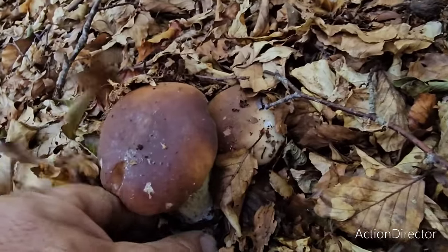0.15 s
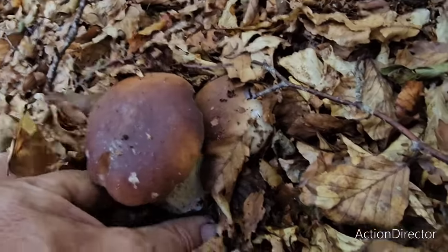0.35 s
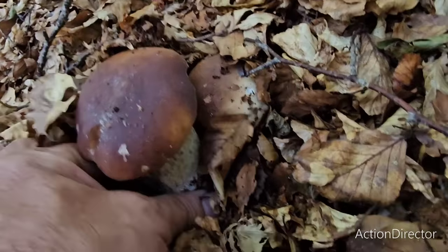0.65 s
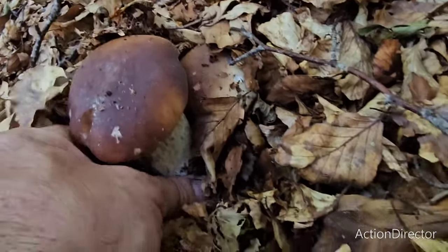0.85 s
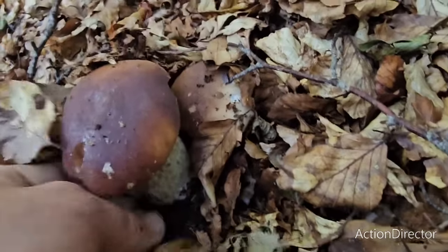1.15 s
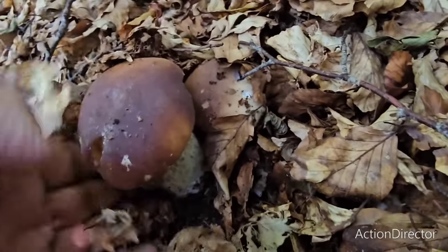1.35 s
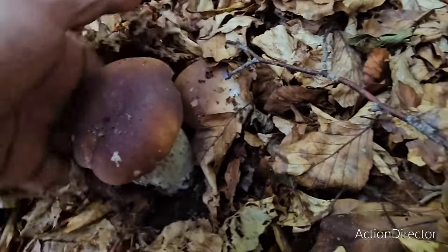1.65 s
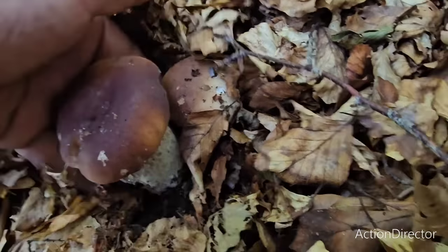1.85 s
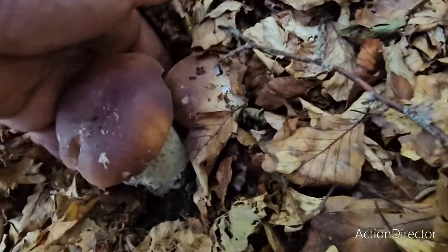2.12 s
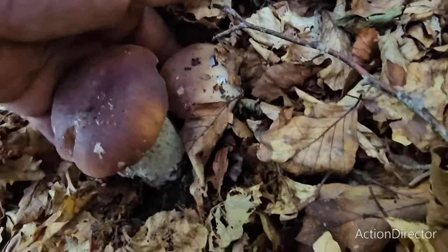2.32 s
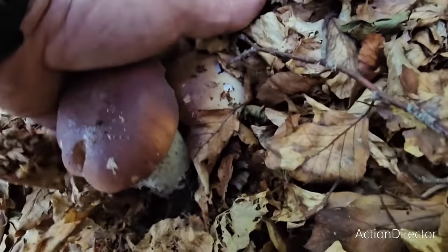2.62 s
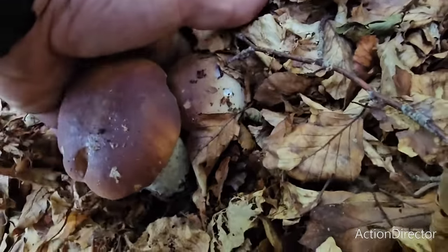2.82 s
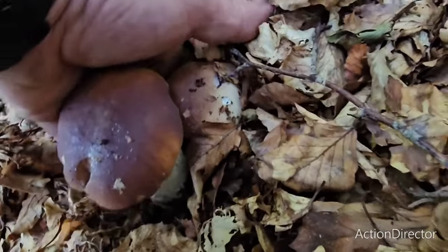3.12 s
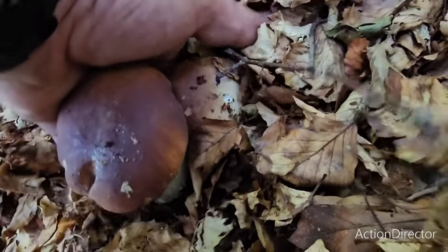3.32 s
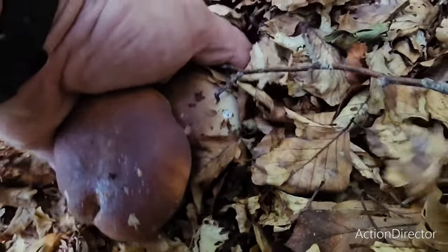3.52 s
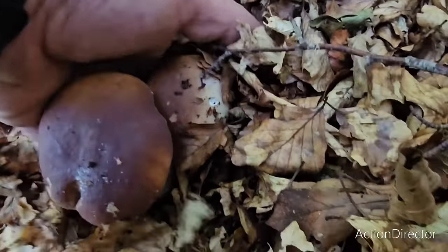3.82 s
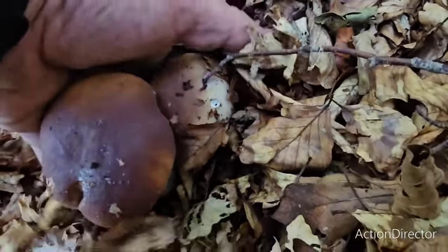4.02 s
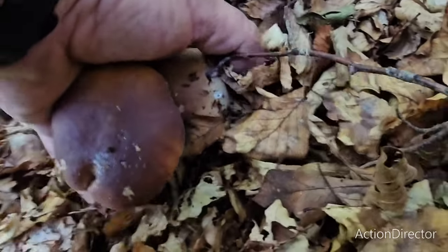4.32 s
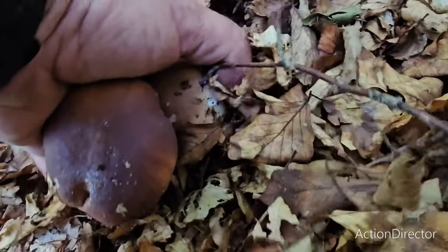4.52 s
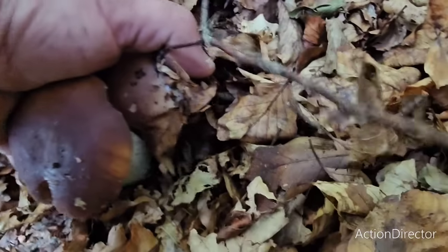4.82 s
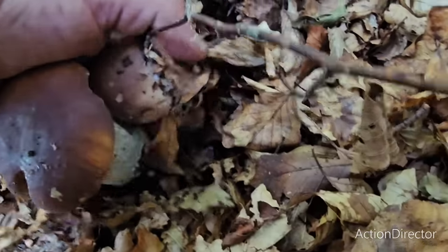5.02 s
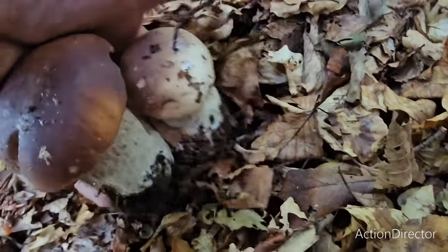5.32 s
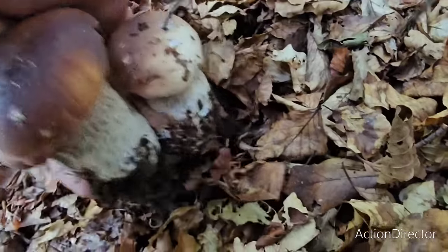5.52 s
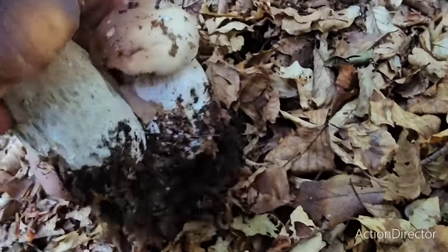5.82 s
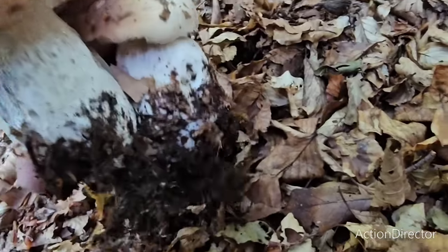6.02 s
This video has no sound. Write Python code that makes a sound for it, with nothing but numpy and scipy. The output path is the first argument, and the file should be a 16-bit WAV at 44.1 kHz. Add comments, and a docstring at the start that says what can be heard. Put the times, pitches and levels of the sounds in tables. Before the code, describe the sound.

Very close, dry stereo sound on a quiet forest floor, with a faint steady hush of air throughout. From 0 to 1.1 s a hand stirs dry leaves in quick, crisp, crackling strokes, the fullest of the take, with sharp snaps around 0.3, 0.5, 0.8 and 0.9 s and brief hollow scraping of a curled leaf near 0.2-0.3 and 1 s. From 1.3 to 2.6 s rustles come in separate swells, with brittle ticks and soft soil thuds. From 2.7 to 4.5 s movement is lighter: fine crumpling, small clicks, and short dull stem knocks near 3.6 s. A quick rustle and low woody pop come at 4.6 s, then small tearing pops around 5 s. At 5.35 s a loud bright double crack with a low jolt stands out. Afterwards only sparse faint ticks, tiny pops and weak soil movement remain until about 6.15 s.

```python
"""Woodland floor: a hand works dry leaf litter, pulling mushrooms from the soil below a phone with two spaced ports.
Leaves crackle in dense grains of decaying noise, a curled leaf scrapes as noise on a sliding tone,
and snaps of leaves and twigs are short filtered bursts. Torn root threads are decaying sines (stem ring, soil jolt).
Filtered grains make the soil thud and the stems hum under each stroke; steady coloured noise is the woodland hush."""
import sys
import numpy as np
from scipy import signal
from scipy.fft import rfft, irfft, next_fast_len
from scipy.io import wavfile
from scipy.ndimage import map_coordinates

SR = 44100
rng = np.random.default_rng(int(sys.argv[2]) if len(sys.argv) > 2 else 0)


def pcm_store(signal):
    """Save signal as 16-bit PCM."""
    levels = np.round(np.clip(np.atleast_2d(signal), -1, 1) * 32767)
    wavfile.write(sys.argv[1], SR, levels.astype(np.int16).T)


N = 271656


def undb(db):
    """Amplitude gain of a level in dB."""
    return 10 ** (np.asarray(db) / 20)


def unit(x):
    """Scale to rms 1."""
    return x / np.sqrt(np.mean(x ** 2))


def unit_mid(pair):
    """Scale so that the mean of both ports has rms 1."""
    return pair / np.sqrt(np.mean(pair.mean(axis=0) ** 2))


def curves(table):
    """Columns of a time table, interpolated linearly at every sample."""
    time_s, *columns = np.transpose(table)
    return [np.interp(np.arange(N) / SR, time_s, column) for column in columns]


def colour(x, points):
    """Filter by (f/Hz, gain/dB) points joined on a log-frequency axis."""
    size = next_fast_len(N)
    hz, db = np.transpose(points)
    log_bins = np.log(np.fft.rfftfreq(size, 1 / SR) + 1)
    gain = undb(np.interp(log_bins, np.log(hz), db, left=-90, right=-90))
    return irfft(rfft(x, size) * gain, size)[..., :N]


def ports(x, lead_ms):
    """One source at both ports: the path to the right one is longer by lead_ms."""
    read_at = np.arange(N) - lead_ms * SR / 1000
    right = map_coordinates(x, [read_at], order=3, mode="nearest")
    return np.array([x, right])


def pan(db):
    """Left and right gains for a left-minus-right level."""
    return undb(np.array([db, -db]) / 2)


def crackle(per_s, scatter_db, tail_ms, most_db=15.0):
    """Noise gated by random cracks of uneven size; crack power decays with time constant tail_ms."""
    crack_db = np.minimum(scatter_db * rng.exponential(size=N), most_db)
    size = undb(crack_db) * (rng.random(N) < per_s / SR)
    power = signal.lfilter([1], [1, -np.exp(-1000 / (tail_ms * SR))], size ** 2)
    return unit(np.sqrt(power) * rng.standard_normal(N))


def patch(lead_ms, spread_ms, diffuse, count, **grain):
    """Crackles from several spots, each with its own path to the ports, plus port-independent scatter."""
    spots = sum(ports(crackle(**grain), lead_ms + spread_ms * k) for k in np.linspace(-1, 1, count))
    scattered = np.array([crackle(**grain), crackle(**grain)])
    return unit(spots) + diffuse * scattered


def effort():
    """Gains of rustle, thud and hum: stroke swells add in power to leaves still settling."""
    # strokes: peak t/s, rustle level/dB, rise and fall/ms per first 10 dB, thud and hum re rustle/dB
    strokes = [(0.059, -41, 400, 48, -13.5, -14.5), (0.188, -35, 68, 43, -9.5, -12.5),
               (0.28, -37, 76, 60, -11.5, -11.5), (0.383, -38, 48, 37, -8.5, -14.5),
               (0.46, -46.5, 60, 64, -6, -11), (0.545, -47.5, 28, 43, -5, -14),
               (0.67, -42, 82, 129, -10, -10), (0.81, -52.5, 33, 28, 2, -20),
               (0.939, -43, 78, 84, -12, -18), (1.016, -36.5, 98, 100, -7, -12.5),
               (1.3, -49, 400, 382, -8.5, -9.5), (1.495, -46, 18, 77, -6, -15),
               (1.61, -40.5, 67, 248, -9.5, -12.5), (1.786, -40, 258, 28, -18, -11.5),
               (1.935, -43, 39, 59, -16, -8.5), (2.063, -42.5, 28, 45, -8.5, -12),
               (2.16, -51, 200, 192, -14, -7), (2.255, -43, 33, 38, -10, -7.5),
               (2.445, -50, 20, 80, -9.5, -26), (2.518, -43.5, 61, 75, -15.5, -12),
               (2.7, -51, 200, 148, -9, -8.5), (2.87, -56, 55.5, 76, -9, -2),
               (3.02, -60, 50, 100, -6, -4.5), (3.14, -52, 177, 145, -8, -13),
               (3.26, -47, 116, 32, -15.5, -14), (3.442, -45, 97, 92, -11.5, -8.5),
               (3.649, -43, 110, 81, -11.5, -7.5), (3.82, -48, 83, 59, -8.5, -9.5),
               (3.93, -51, 62, 118, -9, -9), (4.088, -45, 20, 55, -4, -24),
               (4.15, -50.5, 68, 398, -10, -4.5), (4.415, -50, 302, 24, -16, -24),
               (4.52, -55, 32, 100, -8, -8), (4.597, -40.5, 36, 27, -11, -18),
               (4.65, -50, 40, 62, -12, -10), (4.728, -54, 70, 115, -9, -9),
               (4.849, -51, 117, 72, -15, -7.5), (4.93, -57.5, 40, 54, -10, -16),
               (5.0, -57, 96, 96, -1, -0.5), (5.15, -54.5, 107, 73, -2.5, 0.5),
               (5.25, -59.5, 75, 50, -3, -19), (5.389, -54, 37, 33, 6, 1), (5.44, -62, 62, 52, -20, -22),
               (5.56, -65, 65, 400, 4, 3.5), (5.91, -62.5, 28, 90, -15, -24),
               (5.974, -53, 20, 20, -28, -53.5), (6.15, -63.5, 24, 94, 9, 2)]
    # leaves settling between strokes: t/s, rustle level/dB
    settling = [(0, -53.5), (1.5, -66.5), (2.35, -61.5), (3, -64.5), (4.5, -97), (5.2, -57), (5.6, -74),
                (6.16, -63.5)]
    settling_thud_db = -20  # re settling rustle
    roundness = 1.455  # 1 = pointed swell, 2 = bell-shaped
    ms, rest = np.arange(N) / SR * 1000, undb(curves(settling)[0])
    power = (rest * np.array([[1], [undb(settling_thud_db)], [0]])) ** 2
    for s, db, rise_ms, fall_ms, thud_db, hum_db in strokes:
        late_ms = ms - s * 1000
        distance = np.where(late_ms < 0, -late_ms / rise_ms, late_ms / fall_ms)
        swell = undb(db - 10 * distance ** roundness)
        power = power + (swell * undb([[0], [thud_db], [hum_db]])) ** 2
    return np.sqrt(power)


def ticks(lead_ms, per_s=35., scatter_db=5.0, sharpness=42.0):
    """Stiff leaves flick free: sparse short cracks excite narrow resonances, each pitch at its own spot."""
    # leaf resonances: f/Hz
    leaf_rings_hz = [1307, 2350, 3100, 3640, 3900, 4080, 6500, 7460]
    out = 0
    for hz in leaf_rings_hz:
        flick = crackle(per_s, scatter_db, 0.18)
        ring = unit(signal.lfilter(*signal.iirpeak(hz, sharpness, SR), flick))
        out = out + ports(ring, lead_ms + 0.16 * rng.standard_normal())
    return unit_mid(out)


def leaves(lead_ms, rustle):
    """Crisp crackle, duller crumpling and a fine hiss of leaf edges, all following the hand."""
    # spectra of crisp leaves, crumpling and leaf edges: f/Hz, relative gain/dB
    leaf = [(1800, -73), (2500, -5.5), (3300, 2), (4300, 5.5), (5800, 1.5), (7500, 3.5), (9500, -0.5),
            (11000, -11.5)]
    crumple = [(400, -10.5), (750, -1.5), (1100, -1), (1500, -2), (2000, 0), (2600, -9), (3500, -3)]
    fine_edges = [(8000, -54), (9800, -8), (10500, -4), (11800, 4), (14800, 1.5), (16500, -2)]
    # colour of the rustle: t/s, crumple re crisp/dB, fine hiss re crisp/dB, left minus right/dB
    tone = [(0, -7.5, -3.5, -2.5), (.35, -6, -0.5, 0), (.7, -7, -3.5, 0), (1.0, -5, -4.5, 0),
            (1.3, -4, -0.5, -0.5), (1.7, -7, -1, 1), (2.1, -6.5, -3.5, -0.5), (2.5, -6.5, -1, 1),
            (3.0, -5.5, -2, -0.5), (3.6, -6, -1.5, 0), (4.1, -7.5, 0, -1), (4.6, -7, -1, -0.5),
            (5.0, -7, -1, 0.5), (5.4, -5, -0.5, -1), (5.7, -6.5, -1, -3), (6.16, -10, 2.5, 0)]
    dull_db, fine_db, pan_db = curves(tone)
    bed = patch(lead_ms, 0.072, 1.0, count=4, per_s=500., scatter_db=6.5, tail_ms=3.3)
    # sparse needle-sharp breaks over that bed
    breaks = patch(lead_ms, 0.1, 0.5, count=2, per_s=55.0, scatter_db=0.0, tail_ms=0.16)
    cracks = unit(bed) + 0.38 * unit(breaks)
    folds = patch(lead_ms, 0.082, 0.74, count=2, per_s=300., scatter_db=4.0, tail_ms=3.5)
    edges = patch(lead_ms, 0.091, 1.0, count=2, per_s=470.0, scatter_db=6.5, tail_ms=1.0)
    # the same cracks reach partly into the neighbouring ranges
    dull = unit_mid(colour(folds + 0.54 * cracks, crumple)) * undb(dull_db)
    fine = unit_mid(colour(edges + 0.74 * cracks, fine_edges)) * undb(fine_db)
    crisp = unit_mid(unit_mid(colour(cracks, leaf)) + 0.2 * ticks(lead_ms))
    return (crisp + dull + fine) * rustle * pan(pan_db)


def soil(lead_ms, press, shake):
    """Fingers thud the ground (low-coloured grains) and set the stems humming (two resonances in series)."""
    # thud spectrum: f/Hz, relative gain/dB
    thud_colour = [(20, -40), (40, -23), (70, 1.5), (120, -2), (240, -0.5), (360, -9), (500, -29)]
    grains = patch(lead_ms, 0.25, 0.091, count=2, per_s=120., scatter_db=1.0, tail_ms=12.5)
    thud = colour(grains, thud_colour)
    knocks = patch(lead_ms * 0.48, 0.036, 0.3, count=2, per_s=100.0, scatter_db=0.5, tail_ms=2.5)
    hum = signal.lfilter(*signal.iirpeak(540, 2.2, SR), knocks)
    hum = signal.lfilter(*signal.iirpeak(560, 1.6, SR), hum)
    return unit(thud) * press + unit(hum) * shake


def hush():
    """Steady woodland air: coloured noise, partly alike at both ports."""
    # air spectrum: f/Hz, relative gain/dB
    air_colour = [(18, -25), (30, 21), (103, 21), (328, -17), (554, -14.5), (2060, -14), (2680, -54),
                  (4530, -6.5), (10500, -47), (13000, -24), (16000, -24)]
    level_db = -69
    noise = rng.standard_normal((3, N))
    return unit(colour(noise[0] + 0.73 * noise[1:], air_colour)) * undb(level_db)


def scrape(lead_ms, cutoff_hz=360.0):
    """A curled leaf dragged along: low-passed rubbing modulates a sine that slides in pitch."""
    # hollow ringing of the leaf: t/s, f/Hz, level/dB
    slide = [(.12, 3700, -55), (.18, 3800, -38), (.23, 4200, -52), (.3, 3700, -35.5), (.36, 3600, -60.5),
             (.9, 3200, -53.5), (.97, 3300, -46), (1.01, 3800, -43), (1.05, 4500, -43), (1.1, 4800, -74)]
    hz, db = curves(slide)
    rub = signal.lfilter(*signal.butter(2, cutoff_hz, fs=SR), crackle(490.0, 3.3, 1.0))
    carrier = np.sin(2 * np.pi * np.cumsum(hz) / SR)
    return ports(unit(rub * carrier) * undb(db), lead_ms)


def roots(lead_ms, ring_t60_s=0.025, thud_hz=94.0, thud_t60_s=0.047):
    """A tearing thread rings the stem for a few cycles and jolts the soil: two decaying sines."""
    # tears: t/s, ring peak level/dB, thud re ring/dB
    tears = [(0.165, -40, -25), (0.291, -36, -25), (0.37, -41, -20), (0.529, -40.5, -20), (0.805, -44.5, 8),
             (0.984, -41, -34), (1.051, -38, -6), (1.289, -44, -15), (1.61, -40.5, 1), (1.729, -46, 3),
             (1.836, -43.5, -5), (1.947, -43, -9), (2.234, -41, -14), (2.722, -47, -22), (2.847, -56, -15),
             (2.97, -56, -4.5), (3.548, -34.5, -28), (3.555, -34.5, -29), (3.561, -49, 14),
             (3.584, -47, -14), (3.613, -39.5, -23), (3.641, -32, -13), (3.69, -36.5, -19),
             (4.078, -37.5, -4), (4.139, -50, -12), (4.189, -52, -17), (4.252, -51, 2), (4.582, -47, -15),
             (4.625, -31, -16), (4.652, -40.5, -15), (4.699, -48, -20), (4.833, -43, -11),
             (4.905, -40.5, -27), (4.917, -44, -20), (4.935, -42.5, -26), (4.959, -52, -16),
             (5.006, -39, -14), (5.09, -44, -23), (5.121, -48, 4), (5.145, -44, -13), (5.169, -45, -17),
             (5.306, -39, -23), (5.3538, -26, -9), (5.378, -33, 1), (5.394, -47, 9), (5.519, -39.5, -15),
             (5.541, -43, -3), (5.565, -44, -16), (5.58, -54, -10), (5.775, -49, -15)]
    stem_hz, stem_scatter = 534, .04  # scatter: relative spread from tear to tear
    out, t = np.zeros(N + 4096), np.arange(4096) / SR
    for s, db, thud_db in tears:
        hz = stem_hz * (1 + stem_scatter * rng.standard_normal())
        onset = 1 - np.exp(-t / 0.00047)
        ring = onset * np.sin(2 * np.pi * hz * t) * 1000 ** (-t / ring_t60_s)
        # the jolt sinks to thud_hz as the soil settles
        sunk_s = t + 0.0041 * (1 - np.exp(-t / 0.0073))
        thud = np.sin(2 * np.pi * thud_hz * sunk_s) * 1000 ** (-t / thud_t60_s)
        start = int(s * SR)
        out[start:start + len(t)] += undb(db) * (ring / ring.max() + undb(thud_db) * thud)
    return ports(out[:N], lead_ms * 0.64)


def snaps(lead_ms, body_hz=1370.0, wide_db=-7.0):
    """Leaf and twig snaps: a burst around its own centre, a wide crack and a woody body, with a quick rattle."""
    # snaps: t/s, approximate peak level/dB, centre f/Hz, body re crack/dB, left minus right/dB, length/ms
    breaks = [(0.264, -33, 4470, -19, 4, 1.4), (0.3003, -16.5, 3380, -25, -2, 1.5),
              (0.4923, -27, 3860, 1, 7.5, 2.7), (0.5306, -16, 10100, 6, 2, 1.4),
              (0.761, -26, 3350, 1, -3, 1), (0.805, -18.5, 3600, -29, -5, 0.63),
              (0.9284, -15.5, 5630, -25, 13.5, 0.83), (1.4997, -17.5, 8200, -2, 2, 0.88),
              (1.5852, -23, 3700, -60, -3, 2.3), (1.8376, -26, 9300, 0, -8.5, 1.8),
              (2.143, -30.5, 7340, -23, 2.0, 1.8), (2.2471, -19, 10800, -18, -2, 2.1),
              (2.379, -45, 2000, -2, -17, 1.5), (2.433, -36, 5230, -1, -7, 1.9),
              (2.5821, -27, 8900, -31, 4, 2.8), (2.8657, -29, 4400, 2, -3, 0.46),
              (2.905, -29.5, 9000, -20, 2, 0.74), (2.972, -35.5, 4060, 17, 3, 3.2),
              (3.1394, -32.5, 9000, -17, 9, 3), (3.1858, -26, 11100, -24, 2.5, 1),
              (3.241, -25.5, 8100, -23, 8, 1.9), (3.3776, -29.5, 7160, 7, 0, 0.9),
              (3.6597, -27, 11700, 0, 5, 2.5), (3.7234, -25, 8000, -26, 4, 0.5),
              (3.93, -30.5, 8200, -18, 1, 1.2), (4.0782, -22.5, 11200, -3, 11, 2.3),
              (4.1003, -28, 11500, -21, -2, 1.1), (4.1143, -26.5, 3620, -10, -2, 1.2),
              (4.1643, -29.5, 8180, -17, 9, 1.4), (4.194, -26, 11500, -9, -2, 2.3),
              (4.2523, -23.5, 11600, -3.5, -2, 2.8), (4.3071, -30, 11800, -8, 7, 1.2),
              (4.555, -27, 9000, -19, -3, 1), (4.5676, -24, 7200, -10, 1, 0.84),
              (4.762, -27, 4230, -11, 2.5, 0.47), (4.8546, -28.5, 11100, -33, -12, 2.8),
              (4.9334, -33, 7000, -7, -1, 2.2), (5.3064, -30.5, 6700, 2, 1.5, 2),
              (5.3521, -9.5, 5200, -11, -6.5, 1.1), (5.376, -15.5, 4080, -10, -6, 1.1),
              (5.3936, -32, 3540, -15, -1, 1.4), (5.4395, -41, 4790, -25, -19, 1),
              (5.52, -32.5, 3230, 3, 4, 1.6), (5.5425, -35, 4130, 31, 7, 1.8),
              (5.626, -38, 11800, -20, 8, 1.4), (5.6775, -33.5, 2480, -36, -6, 3.1),
              (5.8384, -33.5, 5140, -4, -3, 1.5), (5.8995, -29.5, 3630, -2, -7, 3.4),
              (6.132, -34.5, 5030, 1.5, 7.5, 5.5), (6.1544, -35, 3040, 11, -12, 3)]
    out, t_ms = np.zeros((2, N + 2048)), np.arange(1024) / SR * 1000
    wide = signal.butter(1, [2800, 6500], "band", fs=SR, output="sos")
    for s, db, hz, body_db, pan_db, length_ms in breaks:
        noise = np.sign(rng.standard_normal((3, len(t_ms))))
        noise[0, 0] = 1.33  # each snap opens with a slightly stronger leading click
        rattle = .12 * np.exp(-t_ms / 2.4)
        shape = np.exp(-(t_ms / length_ms) ** 1.5) + rattle
        both = shape * (noise[0] + 0.66 * noise[1:])  # shared part plus each port's own
        centre = signal.iirpeak(hz, 1.0, SR)
        narrow = signal.lfilter(*centre, signal.lfilter(*centre, both))
        crack = unit(narrow) + undb(wide_db) * unit(signal.sosfilt(wide, both))
        body = unit(signal.lfilter(*signal.iirpeak(body_hz, 1.2, SR), shape * noise[0]))
        burst = crack + undb(body_db) * body
        start = int(s * SR)
        burst[1] = np.roll(burst[1], int(lead_ms[start] * SR / 1000))
        # noise peaks at about twice its running level
        burst = unit(burst) * np.sqrt(np.mean(shape ** 2)) / 2
        out[:, start:start + len(t_ms)] += undb(db) * pan(pan_db)[:, None] * burst
    return out[:, :N]


def scene():
    """All sources at the two ports, placed by the moving hand."""
    # hand position: t/s, lead of the left port/ms
    place = [(0, 0.28), (1, 0.26), (1.5, 0.31), (2.3, 0.43), (2.7, 0.24), (3.3, 0.25), (4, 0.21),
             (4.7, 0.12), (5.3, 0.25), (6.16, 0.42)]
    lead_ms, = curves(place)
    rustle, press, shake = effort()
    hand = leaves(lead_ms, rustle) + soil(lead_ms, press, shake)
    breaking = scrape(lead_ms) + roots(lead_ms) + snaps(lead_ms)
    return hand + hush() + breaking


def record(dry):
    """The ports differ a little in colour; a steep elliptic low-pass cuts the top."""
    # port colour: f/Hz, left minus right/dB
    balance = [(200, 1.5), (700, 0), (1300, -2), (2400, 4), (4400, -1.5), (8000, 3), (15000, 5)]
    top_hz = 15800
    tilt = [(20, 1), *balance, (22050, 0)]
    left = colour(dry[0], [(hz, db / 2) for hz, db in tilt])
    right = colour(dry[1], [(hz, -db / 2) for hz, db in tilt])
    low_pass = signal.ellip(10, .2, 70, top_hz, fs=SR, output="sos")
    return signal.sosfilt(low_pass, np.array([left, right]))


dry = scene()
out = record(dry)
pcm_store(out)
```